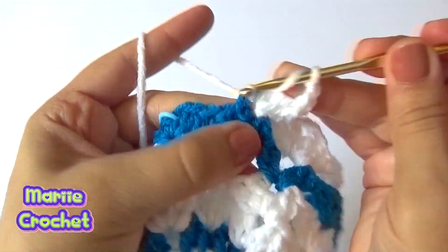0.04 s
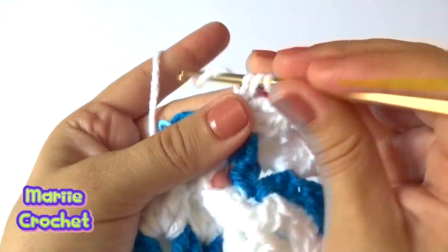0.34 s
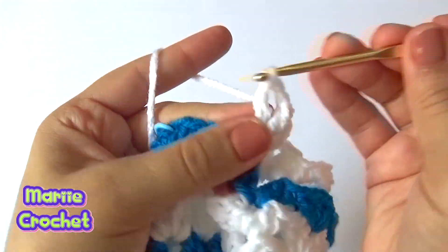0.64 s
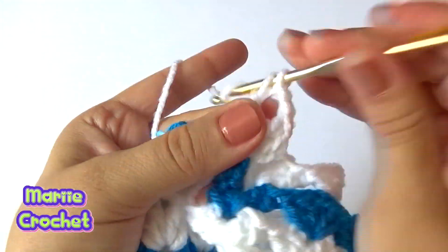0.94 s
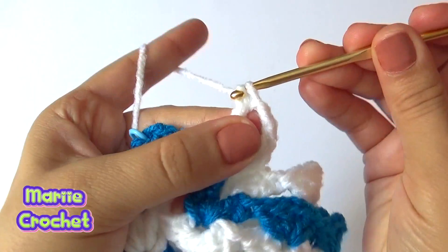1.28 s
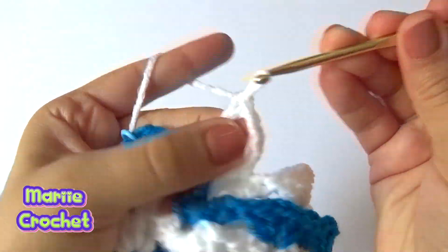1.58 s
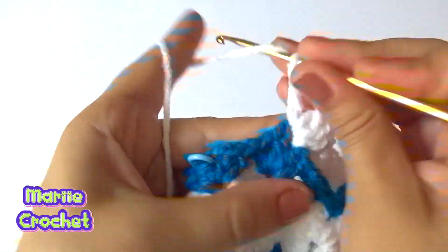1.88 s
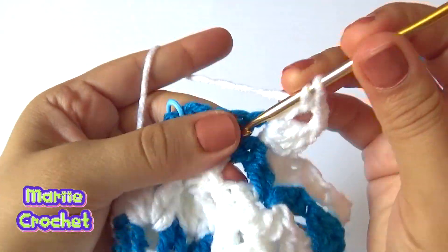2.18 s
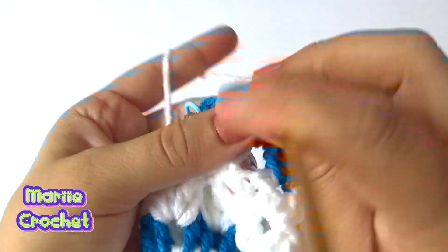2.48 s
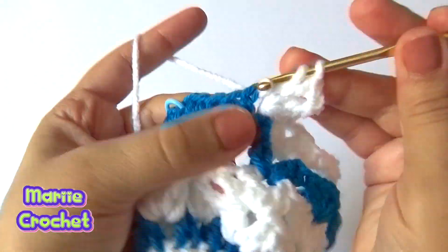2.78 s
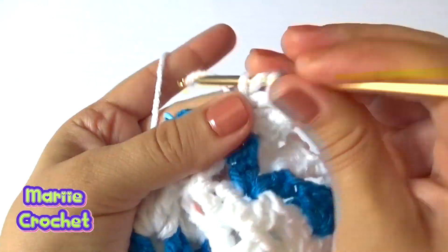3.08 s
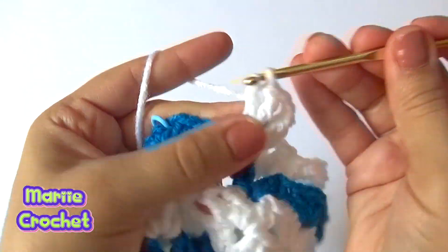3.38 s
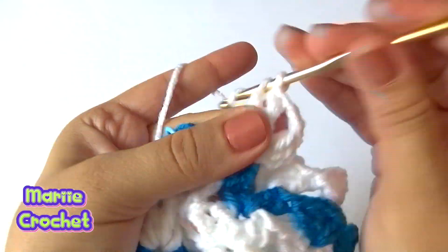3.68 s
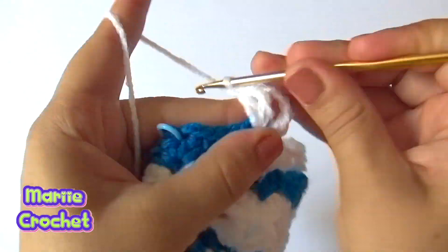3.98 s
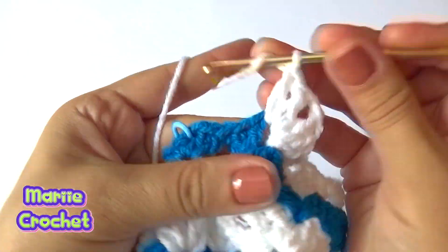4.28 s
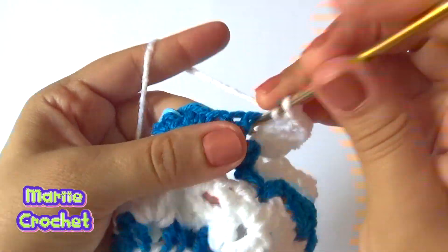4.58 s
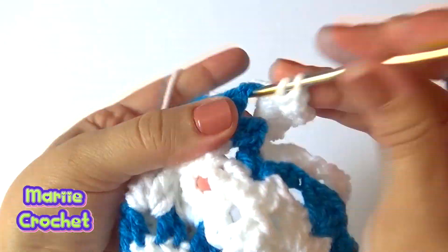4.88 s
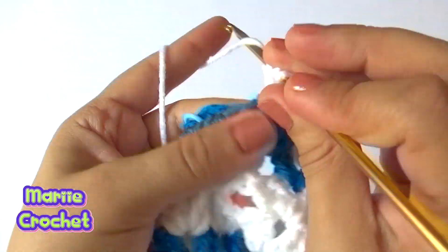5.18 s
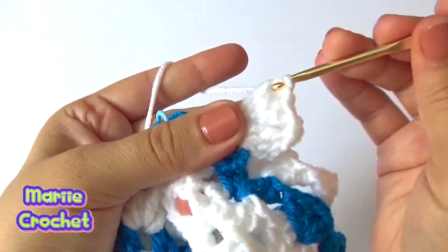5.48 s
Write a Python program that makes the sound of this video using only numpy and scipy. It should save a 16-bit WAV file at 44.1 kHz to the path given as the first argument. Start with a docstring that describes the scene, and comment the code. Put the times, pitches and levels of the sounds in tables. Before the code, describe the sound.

A metal crochet hook drags yarn through stitches close to the microphone, making short, dry, hissy rustles at an uneven pace. Now and then a loop snaps off the hook or the tip jumps a strand with a tiny click. The hands bump softly against the piece. Further off, a clock ticks faintly once a second, and a few tiny high pips sound over low room noise.

```python
"""A metal crochet hook drags yarn through stitches, close by, in short rustles of stick-slip friction.
Countless fibres catch and slip; now and then a loop snaps off the hook or its tip jumps a strand.
The crocheted piece gives a muffled rustle and the hands bump softly. Further off, a clock's pawl
clicks faintly once a second and sets its case ringing. Tiny pips sound over the low room noise."""
import sys
import numpy as np
from scipy import signal
from scipy.fft import rfft, irfft, next_fast_len
from scipy.io import wavfile
from scipy.ndimage import uniform_filter1d, map_coordinates

SR = 44100
rng = np.random.default_rng(int(sys.argv[2]) if len(sys.argv) > 2 else 0)


def unload_wav(signal):
    """Save mono or channel-first audio to the path in sys.argv[1] as 16-bit WAV at rate SR, clipped to [-1, 1]."""
    wavfile.write(
        sys.argv[1],
        SR,
        np.round(np.clip(np.atleast_2d(signal).T, -1, 1) * 32767).astype(np.int16),
    )


N = 249165
T = np.arange(N) / SR

# Spectrum of slipping fibres. Each row: frequency in Hz, gain in dB.
FIBRE_HISS = [(4500, -12), (6000, 1.5), (7500, 2), (9000, 4.5), (10200, -2), (11300, -1.5), (13000, -12),
              (15500, -18.5)]


def undb(db):
    """Amplitude ratio of a level in decibels."""
    return 10 ** (np.asarray(db) / 20)


def unit(x):
    """Normalisation to an rms of 1."""
    return x / np.sqrt(np.mean(x ** 2) + 1e-30)


def noise(size=N):
    """Gaussian white noise."""
    return rng.standard_normal(size)


def shaped(x, points):
    """Zero-phase filtering by (Hz, dB) points, falling 12 dB an octave below the first."""
    hz, db = np.transpose(points)
    size = next_fast_len(x.shape[-1])
    f = np.fft.rfftfreq(size, 1 / SR) + 1
    skirt = np.minimum(f / hz[0], 1) ** 2
    gain = undb(np.interp(np.log(f), np.log(hz), db))
    return irfft(rfft(x, size) * skirt * gain, size)[..., :x.shape[-1]]


def ring(x, hz, width):
    """Resonance with steep flanks: two equal band-pass stages in series."""
    peak = signal.iirpeak(hz, hz / width, fs=SR)
    return signal.lfilter(*peak, signal.lfilter(*peak, x))


def walk(rate, size=N):
    """Random modulation with a spread near 1, gliding to a new value rate times a second."""
    return 1.2 * np.interp(T[:size] * rate, np.arange(4096), noise(4096))


def modes(table, size):
    """Line broadening: tones waver about their resonances (Hz, width Hz, dB); the sum has rms 1."""
    tones = np.zeros(size)
    for hz, width, db in table:
        wavering_hz = hz + width * walk(2 * width, size) / 2
        tones += undb(db) * np.sin(2 * np.pi * np.cumsum(wavering_hz) / SR)
    return unit(tones)


def burst(rise, t60):
    """Damped envelope: a linear rise, then exponential decay by 60 dB in t60 seconds."""
    t = T[:SR // 4]
    return np.minimum(t / rise, 1) * np.exp(-np.log(1000) * np.maximum(t - rise, 0) / t60)


def add(track, s, sound):
    """Superposition of a sound on a track, from s seconds on."""
    i = max(int(s * SR), 0)
    track[i:i + len(sound)] += sound[:N - i]


def walls(x, t60, wet_db):
    """Reverberation: reflections add a short, dull tail, different left and right."""
    shape = burst(0.00045, t60)
    diffuse = shaped(noise((2, len(shape))), [(100, 12.8), (7000, 1.5), (12000, 0.7)])
    tails = diffuse * shape / np.sqrt(np.sum(shape ** 2))
    return x + undb(wet_db) * signal.fftconvolve(np.atleast_2d(x), tails, axes=1)[:, :N]


def room_noise(air_db=-72.5, side_db=-6):
    """Ambient noise with a few wavering resonances; an antiphase part gives it width."""
    # Resonances. Each row: frequency in Hz, half-width of a stage in Hz, level in dB, waver in dB.
    resonances = [(237.8, 20.5, -80, 5), (291.8, 26.4, -80, 5.2), (831, 100, -78, 1.2), (988, 61, -79, 5)]
    # Broadband room noise. Each row: frequency in Hz, gain in dB.
    air_spectrum = [(100, -31.5), (210, -8.5), (330, -16), (420, -10), (1050, -24), (1300, -19),
                    (3000, -16.5), (5000, -24.5), (9000, -21.5), (12000, -30.5), (15500, -28.5)]
    side_spectrum = [(150, -18), (250, -16), (950, -7), (4000, -16.5), (9000, -44), (12000, -57)]
    drone = sum(undb(db + waver_db * walk(15)) * unit(ring(noise(), hz, 2 * half_width))
                for hz, half_width, db, waver_db in resonances)
    air = unit(shaped(noise(), air_spectrum))
    side = unit(shaped(noise(), side_spectrum)) * np.array([[1], [-1]])
    return drone + undb(air_db) * (air + undb(side_db) * side)


def pips(first_s=0.027, period_s=0.03337, faint_db=-70, accent_db=4, whine_db=-74.5, whine_lag_s=0.004):
    """Damped tones, perhaps from a camera lens: a few clear pips over a faint train with a whine."""
    # The clear pips. Each row: start in seconds, level in dB.
    clear_pips = [(.359, -50), (.794, -53.5), (0.859, -54), (.927, -53.5), (0.993, -62), (2.163, -52),
                  (3.996, -53), (4.061, -55.5)]
    # Resonances of a pip. Each row: frequency in Hz, width in Hz, relative level in dB.
    pip_modes = [(2781, 190, -2), (4140, 44, -26)]
    out, shape = np.zeros(N), burst(rise=0.0031, t60=0.052)
    for s, db in clear_pips:
        add(out, s, undb(db) * shape * modes(pip_modes, len(shape)))
    beats = np.arange(first_s, T[-1], period_s)
    fading = walk(2.34)[(beats * SR).astype(int), None]
    scatter_db = 2.5 * np.clip(fading + noise((len(beats), 2)), -3, 2)
    for k, (s, (pip_scatter, whine_scatter)) in enumerate(zip(beats, scatter_db)):
        pip = shape ** 2 * modes(pip_modes, len(shape))
        whine = shape * modes([(3930, 100, 0)], len(shape))
        add(out, s, undb(faint_db + accent_db * (k % 2) + pip_scatter) * pip)
        add(out, s + whine_lag_s, undb(whine_db + whine_scatter) * whine)
    return out


def clock(case_lag_s=0.00591):
    """Impact excitation: the pawl clicks each second, then the modes of the case swell and ring."""
    # Ticks. Each row: start in seconds, click level in dB, case level in dB.
    ticks = [(0.273, -47, -53.5), (1.273, -37, -50.5), (2.258, -65, -65), (3.274, -44.5, -53.5),
             (4.269, -55, -67.5), (5.269, -61, -64)]
    # Modes of pawl and case. Each row: frequency in Hz, width in Hz, relative level in dB.
    pawl_modes = [(2457, 36, 2), (2910, 800, 0), (3680, 520, 2.5), (5570, 400, 5)]
    case_modes = [(535.4, 44.7, 11.5), (782, 300, 8), (894, 98, -6)]
    out, click, hum = np.zeros(N), burst(rise=0.0018, t60=0.027), burst(rise=0.014, t60=0.19)
    for s, click_db, case_db in ticks:
        add(out, s, undb(click_db) * click * modes(pawl_modes, len(click)))
        add(out, s + case_lag_s, undb(case_db) * hum * modes(case_modes, len(hum)))
    return out


def hand_bumps():
    """Soft impacts carry mostly low frequencies: the shifting hands make unpitched thuds."""
    # Bumps. Each row: start in seconds, level in dB.
    bumps = [(0.115, -54.5), (.234, -55.5), (0.415, -53.5), (0.501, -53.5), (2.019, -58), (3.286, -48),
             (4.985, -57.5), (5.251, -54.5), (5.511, -57.5)]
    # Spectrum of a bump. Each row: frequency in Hz, gain in dB.
    thud_spectrum = [(90, -25), (160, -24.5), (220, 2), (300, 2), (390, -13), (800, -29.5), (2000, -31.5)]
    out, shape = np.zeros(N), burst(rise=0.009, t60=0.13)
    for s, db in bumps:
        thud = unit(shaped(shape * noise(len(shape)), thud_spectrum))
        add(out, s, undb(db) * np.std(shape) * thud)
    return out


def fabric(rubbing, relative_db=-28.5, follow_exponent=0.22):
    """Amplitude modulation: the muffled rustle of the shifting piece loosely follows the rubbing."""
    # Spectrum of the crocheted piece. Each row: frequency in Hz, gain in dB.
    muffled_spectrum = [(200, -5.5), (300, 3.5), (420, -10.5), (950, 0), (1300, -16.5), (2500, -15),
                        (5000, -41)]
    effort = np.sqrt(np.abs(uniform_filter1d(rubbing ** 2, size=4000)))
    rustle = unit(effort ** follow_exponent * shaped(noise(), muffled_spectrum))
    return undb(relative_db) * np.std(rubbing) * rustle


def loop_snaps(ring_db=-5, fizz_db=-12, rise_share=0.054):
    """Damped vibration: a released loop flicks the hook, which rings amid a bright fizz of fibres."""
    # Releases. Each row: start in seconds, level in dB, ring frequency in Hz, 60 dB decay in seconds.
    releases = [(0.608, -25, 3980, 0.011), (1.1, -35, 3910, 0.051), (1.5316, -38.5, 6900, 0.02),
                (1.695, -37.5, 3450, 0.089), (2.356, -41.5, 2340, 0.021), (3.222, -45.5, 6420, 0.16),
                (3.25, -44, 6900, 0.095), (3.325, -34, 8870, 0.075), (3.828, -43.5, 1833, 0.089),
                (3.967, -44.5, 3690, 0.26), (4.041, -41, 3860, 0.079), (4.861, -43, 4030, 0.13)]
    out = np.zeros(N)
    for s, db, hz, t60 in releases:
        shape = burst(rise_share * t60, t60)
        width_hz = np.clip(14 / t60, hz / 8, hz / 2.5)  # quick: a broad tick; slow: a narrow squeak
        body = undb(ring_db) * modes([(hz, width_hz, 0)], len(shape))
        fizz = undb(fizz_db) * unit(shaped(noise(len(shape)), FIBRE_HISS))
        add(out, s, undb(db) * shape * (body + fizz))
    return out


def tip_clicks(rise_s=0.00061, overtone_ratio=1.4, overtone_db=-5, bright_hz=8620, fibres_db=-18):
    """Cushioned impact: the tip jumps a strand with a tick rounded by yarn, then loose fibres stir."""
    # Jumps. Each row: start in seconds, level in dB, ring frequency in Hz, bright mode in relative dB.
    jumps = [(0.6111, -31.5, 3260, -11), (1.7088, -39, 3600, 9), (2.356, -47, 1520, -15),
             (2.6608, -31, 2930, 6), (2.749, -38, 5450, 10.5), (3.3382, -36, 5870, 7.5),
             (3.674, -40, 5000, -2), (3.773, -39.5, 6400, -1), (4.2914, -39, 5930, -13),
             (4.7762, -34, 4040, 4.5), (4.866, -32.5, 4120, -32), (5.5446, -35, 4960, 6.5)]
    out, tail = np.zeros(N), burst(rise=0.0017, t60=0.087)
    t = T[:len(tail)]
    pulse = (t / rise_s * np.exp(1 - t / rise_s)) ** 2
    turn = 2 * np.pi * t
    for s, db, hz, bright_db in jumps:
        tick = np.sin(hz * turn) + undb(overtone_db) * np.sin(overtone_ratio * hz * turn)
        tick += undb(bright_db) * np.sin(bright_hz * turn)
        fibres = undb(fibres_db) * unit(ring(noise(len(tail)), hz, hz / 2))
        add(out, s, undb(db) * (pulse * tick + tail * fibres))
    return out


def crackle(breaks_per_s=64, spread_db=4):
    """Shot noise: lone fibres break free at random with tiny bright ticks."""
    breaks = (rng.random(N) < breaks_per_s / SR) * undb(spread_db * np.clip(noise(), -2, 1))
    tick = noise(60) * np.hanning(60)
    return unit(shaped(signal.fftconvolve(breaks, tick)[:N], FIBRE_HISS))


def friction(spectrum, grain_db=3.5, patchy_db=6.5, judder_db=1.6, patch_rate=55, bands=64):
    """Stick-slip friction: dense, uneven slips, whose resonances come and go as the contact shifts."""
    slips = np.sign(noise()) * (rng.random(N) < 0.5)
    slips *= undb(grain_db * np.minimum(rng.exponential(size=N), 4))
    f, t, frames = signal.stft(slips, SR, nperseg=512)
    band_index = np.interp(f, np.geomspace(1000, 12000, bands), np.arange(bands))
    place = np.meshgrid(band_index, t * patch_rate, indexing="ij")
    patches = undb(patchy_db * map_coordinates(noise((bands, 1024)), place, order=1))
    rub = unit(shaped(signal.istft(frames * patches, SR)[1][:N], spectrum))
    # The hand pulls evenly: energy moves between the resonances while its sum holds.
    power = uniform_filter1d(rub ** 2, size=900)
    judder = undb(judder_db * walk(rate=200))
    return unit(rub / np.sqrt(power + 1e-9) * judder)


def hollow(x, hz, depth_db, width_octaves=0.32):
    """Spectral notch with a raised shoulder on each side; a negative depth makes it a peak."""
    f = np.geomspace(1000, 16000, 80)
    away = (np.log2(f / hz) / width_octaves) ** 2
    gain_db = -depth_db * (1 - away) * np.exp(-away / 2)
    return shaped(x, np.transpose([f, gain_db]))


def pulls():
    """Motion that drives the friction: each pull as (timing, levels, notch)."""
    # The hook works through a stitch. Each row: peak time in seconds, hiss in dB, length in seconds,
    # tightness (scrape relative to hiss) in dB, notch frequency in Hz, notch depth in dB.
    strokes = [(.006, -43.5, 0.059, -1, 3200, 3), (0.185, -50.5, 0.063, -0.5, 6000, 1),
               (0.241, -39, 0.036, -7, 2280, -1), (0.272, -44.5, 0.057, -0.5, 2180, 4),
               (0.348, -40, 0.029, -13, 4500, 7), (0.375, -49, 0.078, 0, 4400, 2),
               (0.841, -44.5, 0.042, -37, 4150, 8), (0.937, -41, 0.03, -15, 5460, 2.5),
               (0.995, -57, 0.05, 5.5, 3570, 3), (1.279, -64, 0.046, 11, 7140, -8),
               (1.723, -41.5, 0.051, -0.5, 5390, 13.5), (1.766, -43, 0.057, -1, 6300, 4.5),
               (1.869, -39.5, 0.1, -11, 2640, 11.5), (1.971, -39, 0.037, -14, 4670, -0.5),
               (2.585, -44.5, 0.061, -1.5, 6200, 5.5), (2.758, -44.5, 0.052, 2, 4430, 11.5),
               (2.828, -39.5, 0.025, -12, 6500, 0.5), (2.928, -44.5, 0.068, -19, 6900, 9),
               (2.984, -42.5, 0.04, -5.5, 2530, 11.5), (3.116, -42, 0.034, -8, 5850, 1.5),
               (3.34, -46.5, 0.011, 4, 6700, -7), (3.83, -36, 0.02, -2, 4900, 6),
               (3.856, -43.5, 0.028, 0.5, 4330, 5), (3.996, -44.5, 0.043, -7.5, 5730, 16),
               (4.29, -51.5, 0.046, -0.5, 4670, 6), (4.325, -52.5, 0.027, -27, 4200, 33),
               (4.775, -48, 0.067, -3.5, 6900, 1), (4.947, -34.5, 0.035, -2, 3780, 5.5),
               (5.005, -46, 0.04, -1, 3630, 13), (5.18, -48.5, 0.055, -1.5, 4450, 2),
               (5.275, -57, 0.0089, 7, 6500, -5), (5.296, -50, 0.068, -1.5, 4600, 4),
               (5.317, -43, 0.025, -6.5, 4540, -1)]
    # The hook slips clear of the loops. Each row: peak time in seconds, hiss in dB, tightness in dB,
    # notch frequency in Hz, notch depth in dB.
    slips = [(0.223, -39.5, 1, 2290, 9), (0.615, -39.5, 4.5, 5300, 4.5), (.829, -53.5, 5.5, 4200, 2.5),
             (1.105, -39.5, -11.5, 4900, 3.5), (2.666, -48, -12, 5900, 5), (3.566, -36, -6, 2550, 6.5),
             (3.578, -42, -4.5, 2480, 13), (3.673, -47.5, -2, 3650, 5), (3.781, -51, -10, 4450, 16),
             (5.398, -50.5, -14, 6700, 9), (5.544, -48, 0, 6100, 3)]
    # Slack yarn runs evenly over the finger. Each row: start and end in seconds, hiss in dB,
    # notch frequency in Hz.
    feeds = [(0.121, 0.18, -54, 5740), (0.43, 0.607, -61, 4850), (0.854, 0.98, -49.5, 3460),
             (0.99, 1.062, -53.5, 3700), (1.482, 1.512, -61, 5660), (1.525, 1.58, -50, 5200),
             (1.82, 1.93, -48, 2920), (1.99, 2.107, -59.5, 6050), (2.164, 2.224, -62, 5900),
             (2.59, 3.074, -65.5, 6550), (2.765, 2.808, -47.5, 3980), (3.214, 3.305, -58, 4730),
             (3.488, 3.536, -64.5, 5000), (3.624, 3.745, -53.5, 3650), (4.038, 4.084, -48, 5560),
             (4.075, 4.143, -46, 5400), (4.346, 4.472, -54.5, 4800), (4.868, 4.92, -60, 6300),
             (5.091, 5.17, -61, 6100), (5.378, 5.472, -61, 5200)]
    for s, db, length, tight_db, hz, depth_db in strokes:
        yield (s, s, 0.42 * length, 0.58 * length), (db, tight_db, tight_db - 11.5), (hz, depth_db)
    for s, db, tight_db, hz, depth_db in slips:
        yield (s, s, 0.0092, 0.017), (db, tight_db, -22), (hz, depth_db)
    for start, end, db, hz in feeds:
        yield (start, end, 0.011, 0.026), (db, -9, -22.5), (hz, 3)


def yarn(crackle_db=-10):
    """Friction noise grows with sliding speed: fibres hiss, and tight loops add scrape and rasp."""
    # Spectra of the scraping hook and the rasping yarn. Each row: frequency in Hz, gain in dB.
    scrape_spectrum = [(2400, -80), (3200, 3), (4000, 6.5), (5400, 7.5), (6800, -5.5)]
    rasp_spectrum = [(800, -57), (1400, -7), (2000, -0.5), (2500, 7.5), (3100, 5.5), (4000, -61)]
    textures = np.array([friction(colour) for colour in (FIBRE_HISS, scrape_spectrum, rasp_spectrum)])
    textures[0] += undb(crackle_db) * crackle()
    out = np.zeros(N)
    for (start, end, swell_s, fade_s), (db, scrape_db, rasp_db), notch in pulls():
        span = np.arange(*np.searchsorted(T, [start - 4 * swell_s, end + 4 * fade_s]))
        # The yarn lets go quickly, runs from start to end and slows more gently.
        before = np.maximum(start - T[span], 0) / swell_s
        after = np.maximum(T[span] - end, 0) / fade_s
        speed = np.exp(-before ** 1.5 - after ** 1.3)
        fibres = undb([0, scrape_db, rasp_db]) @ textures[:, (span + rng.integers(N)) % N]
        out[span] += undb(db) * speed * hollow(fibres, *notch)  # each grip has its own notch
    return out


def scene():
    """Distance sets the share of reverberation: the hands are close and dry, the clock further off."""
    # Response of the microphone. Each row: frequency in Hz, gain in dB.
    mic_response = [(170, -2.5), (9500, -2.5), (10400, -7), (11500, -18.5), (15500, -22.5)]
    rubbing = yarn()
    handwork = rubbing + fabric(rubbing) + loop_snaps() + tip_clicks() + hand_bumps()
    near = walls(handwork, t60=0.056, wet_db=-17)
    far = walls(clock(), t60=0.15, wet_db=-9)
    return shaped(near + far + pips(), mic_response) + room_noise()


def record(dry):
    """Band limiting: a steep low-pass filter cuts the treble above 15.8 kHz."""
    return signal.sosfilt(signal.ellip(10, 0.2, 70, 15800, fs=SR, output="sos"), dry)


dry = scene()
out = record(dry)
unload_wav(out)
```